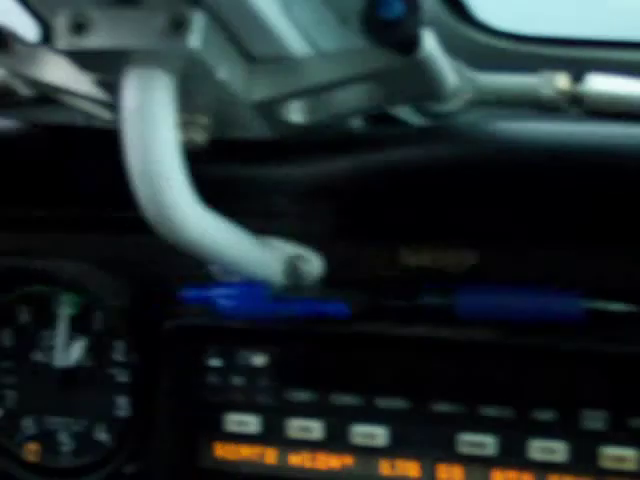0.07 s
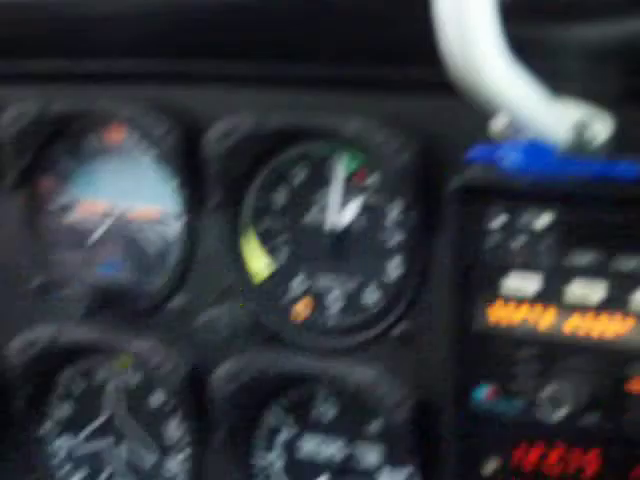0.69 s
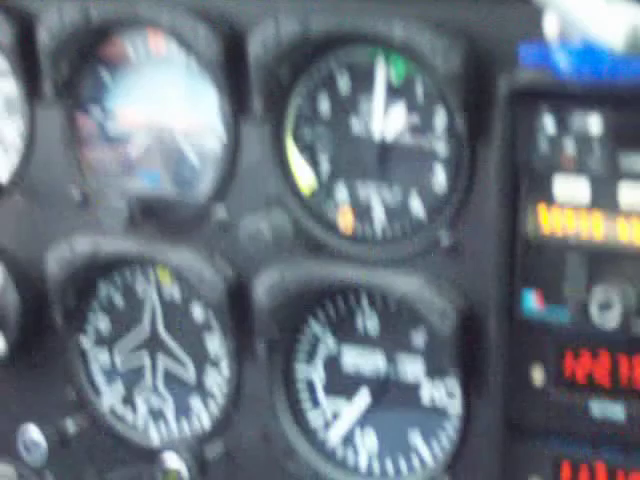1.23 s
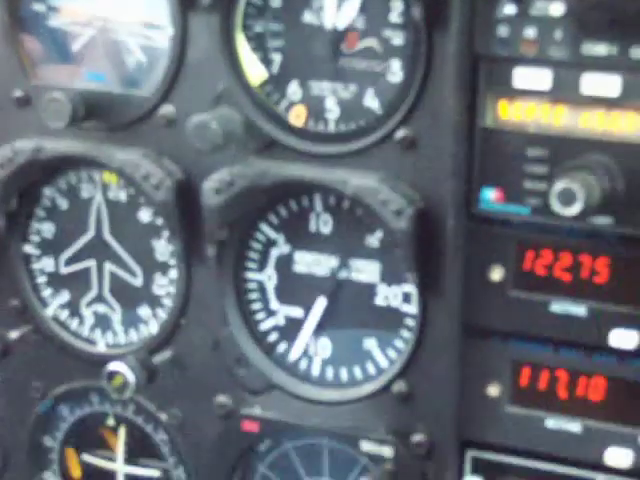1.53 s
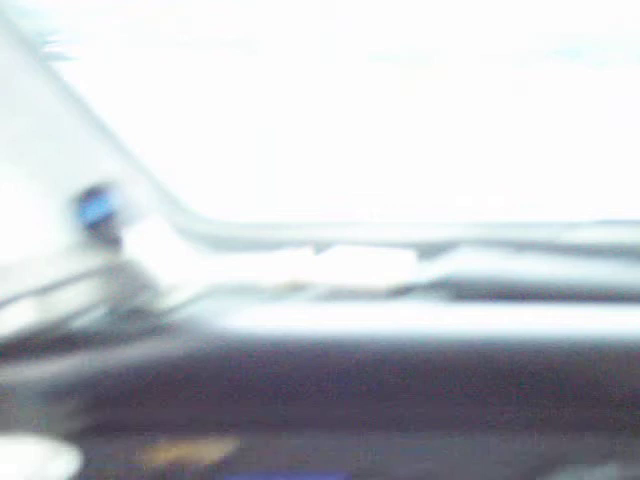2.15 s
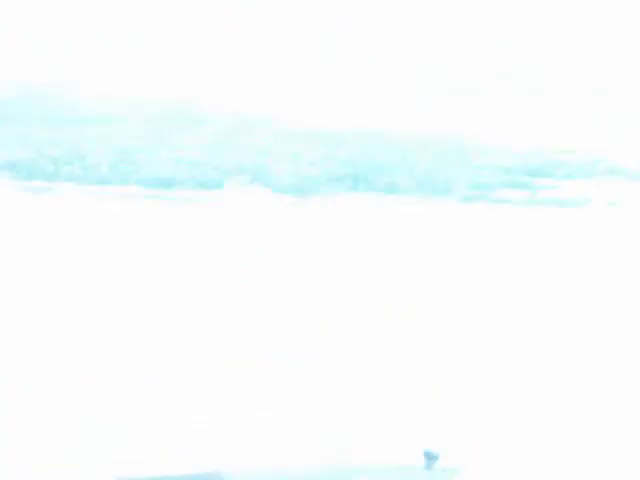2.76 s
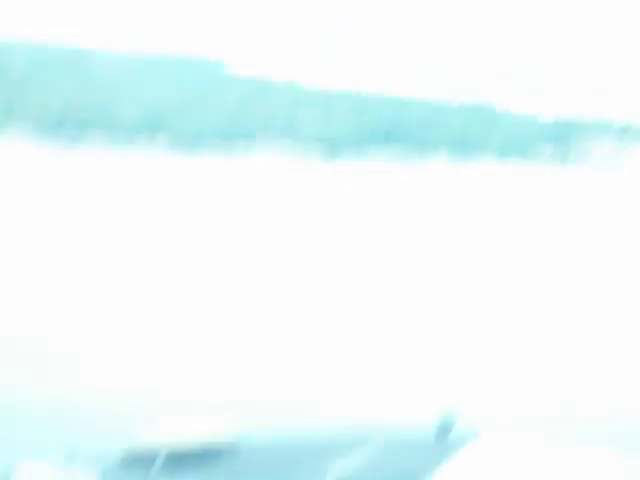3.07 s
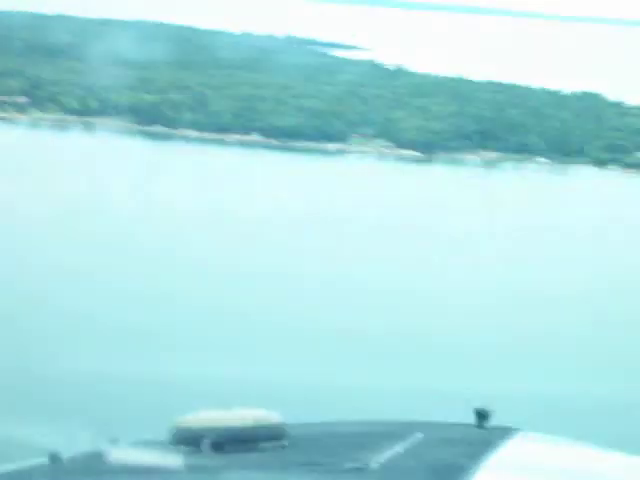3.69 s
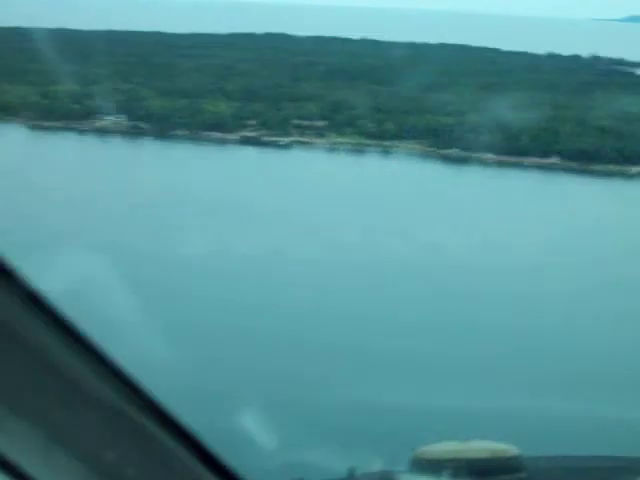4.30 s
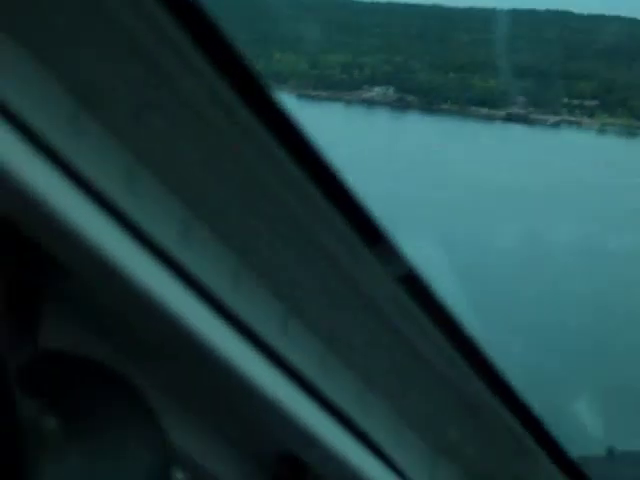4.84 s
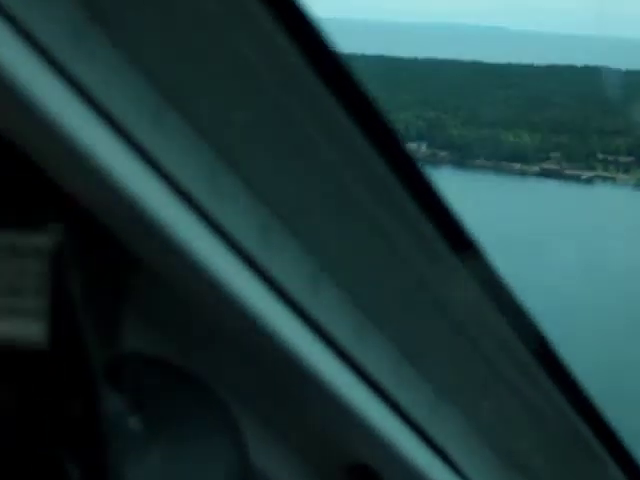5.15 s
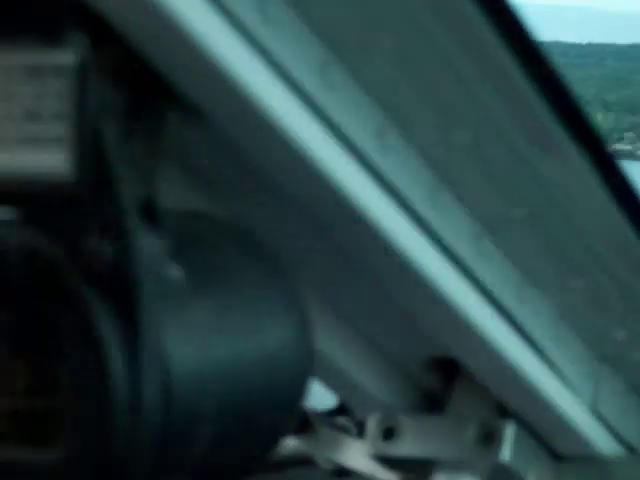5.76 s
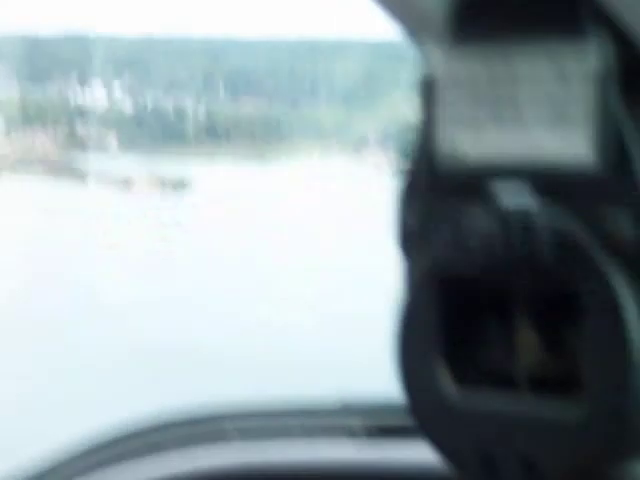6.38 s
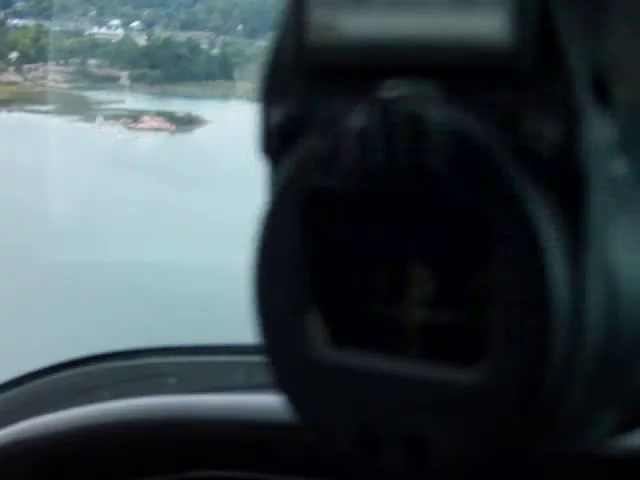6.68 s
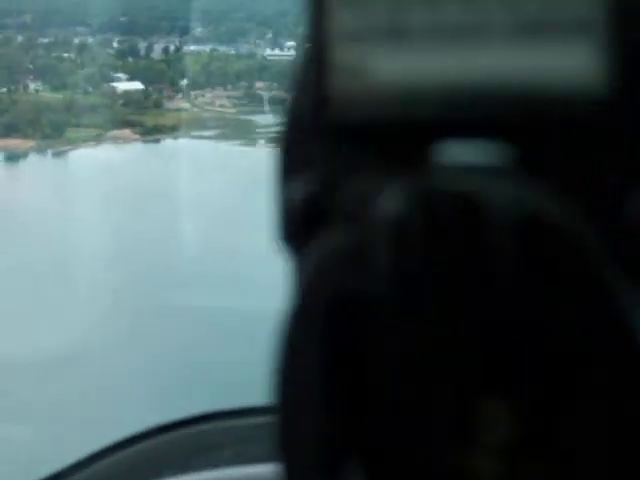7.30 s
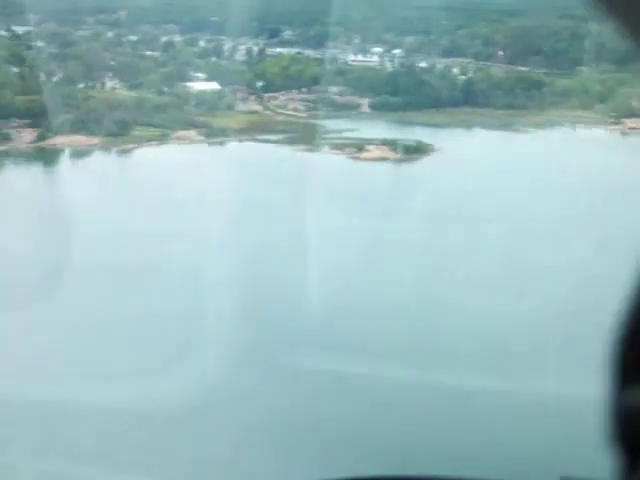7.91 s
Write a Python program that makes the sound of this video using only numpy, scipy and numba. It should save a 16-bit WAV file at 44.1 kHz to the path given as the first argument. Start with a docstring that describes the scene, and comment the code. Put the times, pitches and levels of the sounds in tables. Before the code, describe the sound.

Inside the cabin of a small plane in level flight, a loud piston engine and propeller drone steadily over low rumble and hissing air. A thin electric pump whine sinks slowly in pitch and stops with a faint click about halfway through. Near the end comes one sharp, hard click. The tone of the drone shifts a little as the hand-held microphone turns.

```python
"""Seaplane cabin in level flight.

Four-cylinder exhaust and propeller drone through the cabin's standing waves as a hand-held microphone
turns. Propeller wash beats on the hull; slipstream, seals and an air vent hiss. An electric pump whines,
slowing under load until it clicks off. Later a hard click ducks the limiter. The treble is cut, except
for one thin tick."""
import sys
import numpy as np
from scipy import signal
from scipy.fft import rfft, irfft, next_fast_len
from scipy.io import wavfile
from scipy.ndimage import map_coordinates
from numba import njit

SR = 44100
rng = np.random.default_rng(int(sys.argv[2]) if len(sys.argv) > 2 else 0)


def transcribe(u):
    """Save the signal u as a 16-bit wav file named by the first command-line argument.

    u: samples, shape (n,) or (channels, n), limited to [-1, 1]; the rate is SR.
    q: integer samples, one column per channel.
    """
    v = np.clip(np.atleast_2d(u).T, -1, 1)
    q = np.round(v * 32767).astype(np.int16)
    wavfile.write(sys.argv[1], SR, q)


N = 358533

# (time [s], firing and blade rate [Hz])
BEAT_RATE = [(0, 76.77), (1.2, 75.4), (2.0, 74.9), (3.6, 73.7), (4.3, 74.18), (5.2, 75.8), (5.6, 76.04),
             (6.0, 76.17), (7.6, 74.56), (8.13, 74.16)]

def crank_turns():
    """Running count of crank turns: two beats a turn, with slight jitter."""
    beat_hz, = curves(BEAT_RATE)
    return np.cumsum(beat_hz / 2 * (1 + .0012 * walk(12))) / SR


# Beat and octave, even across the cabin: (crank order, peak level [dB])
BOOM_ORDERS = [(2, -21.5), (4, -19.7)]
# (nominal crank order, peak level off the spot [dB], lift at the spot [dB], spot [deg])
STANDING_ORDERS = [(5, -35, 7, 66), (6, -35, 5, 66), (7.9, -41.5, 13.5, 57), (10, -37, 5, 33),
                   (12, -28.5, -3.5, 110), (14, -40, 12, 116), (16, -43, 10.5, 55), (18, -37, 8, 63.3),
                   (20, -37, 4.5, 58), (26, -47.5, 9, 42), (31.83, -51, 11, 71)]
# (crank order, base level [dB])
WEAK_ORDERS = [(3.5, -39.5), (4.5, -44.5), (7.5, -42.5), (8.5, -38.5), (13, -45), (22, -44.5), (24, -48),
               (28, -48.5), (30, -46.5), (34, -48), (36, -49), (38, -47), (42, -57.5), (44, -47)]

def engine_drone(turns, aim_deg, scatter_rad=.188, crank_spot_width_deg=300):
    """Firings and blades are pressure dips; the swaying microphone crosses their standing waves."""
    def partial(order, smear_rad):
        order = round(2 * order) / 2  # firing pattern repeats every two turns
        cabin_phase = smear_rad * order * rng.standard_normal()
        return -np.cos(2 * np.pi * order * turns + cabin_phase)
    out = 0
    for order, db in BOOM_ORDERS:
        out += undb(db + .76 * walk(1.5)) * (1 + .08 * walk(7.3)) * partial(order, scatter_rad / 2)
    for order, db, lift_db, spot_deg in STANDING_ORDERS:
        width_deg = crank_spot_width_deg / order  # narrows with wavelength
        level_db = db + lift_db * near_spot(aim_deg, spot_deg, width_deg) + 1.84 * walk(2.49)
        out += undb(level_db) * (1 + .08 * walk(9)) * partial(order, scatter_rad / 2)
    for order, db in WEAK_ORDERS:
        level_db = db + .5 + 2.5 * walk(1.614)
        out += undb(level_db) * (1 + .21 * walk(22)) * partial(order, scatter_rad)
    return out


# Both: (frequency [Hz], relative density [dB])
LOW_WASH_SPECTRUM = [(150, -20.5), (245, -3.5), (270, 0.5), (320, 0.5), (370, -1), (415, -0.5), (460, 1),
                     (505, -2), (560, -3.5), (640, -17.5)]
HIGH_WASH_SPECTRUM = [(480, -14.5), (600, -0.5), (660, 2.5), (710, -0.5), (760, -0.5), (805, 0),
                      (900, -7.5), (1300, -15), (2200, -29.5)]

def propeller_wash(turns, aim_deg):
    """Air thrown on the hull, pulsing with the blades."""
    gusts = blade_gusts(turns, depth_db=6.5, uneven_db=1.85)
    low = air_gain("low wash", aim_deg) * colour(noise() * gusts, LOW_WASH_SPECTRUM)
    high = air_gain("high wash", aim_deg) * colour(noise() * gusts, HIGH_WASH_SPECTRUM)
    return undb(.47 * walk(3)) * (low + high)


# (frequency [Hz], relative density [dB])
RUMBLE_SPECTRUM = [(14, -20), (28, -17), (48, -11.5), (70, -8.5), (105, 0), (130, -8), (195, -8.5),
                   (240, -20.5), (400, -32)]

def hull_rumble(rms_db=-24.5):
    """Low, nearly steady noise of the hull."""
    return undb(rms_db + .5 * walk(3)) * colour(noise(), RUMBLE_SPECTRUM)


# (time [s], 3rd slot harmonic peak [dB], 4th slot harmonic peak [dB])
WHINE_LEVELS = [(0, -23.5, -59), (0.599, -28, -56), (1.0, -37, -51.5), (1.9, -34.5, -41), (2.2, -32, -49.5),
                (3.2, -34, -43), (3.75, -27.5, -40), (4.05, -31.5, -38.5), (4.5, -37, -49)]
# (shaft order, initial peak level [dB])
ROTOR_TONES = [(7, -42), (9, -50), (16, -44), (22, -52), (23, -41), (25, -38), (26, -49), (30, -53),
               (31, -48), (33, -54)]

def pump(start_hz=175.4, sag_hz_per_s=3.15, slots=8, off_s=4.52):
    """Motor slots sing, slowing as the load grows; the lopsided rotor adds side tones."""
    t = np.arange(N) / SR
    shaft_hz = (start_hz - sag_hz_per_s * t) * (1 + .0004 * walk(25))
    angle = 2 * np.pi * np.cumsum(shaft_hz) / SR
    out = undb(-36.5 - 2.5 * t + 2.5 * walk(5.5)) * np.sin(slots * angle)
    for harmonic, db in zip((3, 4), curves(WHINE_LEVELS)):
        out += undb(db + .2 * walk(12)) * np.sin(harmonic * slots * angle)
    for order, db in ROTOR_TONES:
        standing_wave_db = 2 * walk(4)
        out += undb(db - 2.17 * t + standing_wave_db) * np.sin(order * angle)
    running = np.clip((off_s - t) / .02 + 1, 0, 1)
    return out * running


# Switches and hard plastic: (time [s], strength [dB], t60 scale, relative rattle [dB])
CONTACTS = [(4.521, -16.5, 2.5, -14), (4.526, -20, 2, -14), (7.1887, -1.5, 0.91, -15.5)]
# (frequency [Hz], relative level [dB], base t60 [s])
CONTACT_MODES = [(2600, -7, 0.016), (2895, -9.5, 0.021), (3310, -2, 0.02), (3550, -9.5, 0.021),
                 (4470, -8, .032), (5050, -8, 0.037), (5630, -13, 0.031), (6250, -37, .02)]

def clicks(rattle_t60_s=.053, rattle_hz=3600, rattle_width_hz=2200):
    """Sharp contacts ring small hard parts, which chatter briefly and radiate no bass."""
    out, t = np.zeros(N), np.arange(SR // 10) / SR
    for time_s, db, t60_scale, rattle_db in CONTACTS:
        modes = 0
        for hz, mode_db, t60_s in CONTACT_MODES:
            tilt_db = .46 * db * np.log2(hz / rattle_hz)  # gentler contact: longer, duller
            decay_db = 60 * t / (t60_s * t60_scale)
            modes += undb(mode_db + tilt_db - decay_db) * np.sin(2 * np.pi * hz * t)
        chatter = resonate_twice(rng.standard_normal(len(t)), rattle_hz, rattle_width_hz)
        chatter *= undb(rattle_db - 60 * t / rattle_t60_s)
        start = int(time_s * SR)
        out[start:start + len(t)] += undb(db) * (modes / 2 + chatter)
    return signal.sosfilt(signal.butter(4, (2300, 6200), "bandpass", fs=SR, output="sos"), out)


# (frequency [Hz], relative density [dB])
SLIPSTREAM_SPECTRUM = [(600, -16.5), (1100, -1.5), (1550, -2), (2100, 2), (2500, -0.5), (3200, -2.5),
                       (4500, -12.5), (6500, -48.5)]

def slipstream(turns, aim_deg):
    """Air rushing past the cabin, roughened by uneven blade gusts."""
    gusts = blade_gusts(turns, depth_db=0, uneven_db=2.5)
    return air_gain("slipstream", aim_deg) * colour(noise() * gusts, SLIPSTREAM_SPECTRUM)


# (frequency [Hz], relative density [dB])
SEAL_SPECTRUM = [(1500, -13), (2900, -11.5), (3200, 0), (3650, 1), (4000, 2.5), (4400, 2.5), (5000, -1.5),
                 (5600, -7.5), (6100, -16.5), (6700, -34)]

def seal_hiss(aim_deg):
    """Air hissing at the seals, flickering slightly."""
    return air_gain("seals", aim_deg) * undb(walk(10)) * colour(noise(), SEAL_SPECTRUM)


# Vent first: (centre [Hz], nominal width [Hz])
HISS_BANDS = [(2715, 230), (3330, 180), (4460, 240)]
# (time [s], vent [dB], middle band [dB], upper band [dB])
HISS_LEVELS = [(0, -32, -44, -53), (1.6, -32, -41.5, -47.5), (2.03, -30, -42, -48),
               (2.45, -37.5, -51.5, -54), (4.5, -39.5, -51.5, -53.5), (6.4, -35.5, -46, -52.5),
               (6.85, -31.5, -36, -46), (7.2, -35, -44, -44), (8.13, -32.5, -42, -41)]

def resonant_hiss():
    """Air rings in the vent and two higher resonances; levels shift as the microphone turns."""
    return sum(undb(db + .89 * walk(12)) * resonate_twice(noise(), hz, 1.5 * width_hz)
               for (hz, width_hz), db in zip(HISS_BANDS, curves(HISS_LEVELS)))


# {noise name: base level [dB]}
AIR_LEVELS = {"low wash": -28, "high wash": -32, "slipstream": -34, "seals": -34}
# (noise name, lift [dB], spot [deg], width [deg])
CABIN_SPOTS = [("low wash", -1.1, 0, 8), ("low wash", 1.5, 78, 14), ("high wash", -1.8, 0, 5.3),
               ("high wash", 1.7, 46, 28), ("high wash", 2, 120, 7), ("slipstream", 2.8, 67, 30),
               ("slipstream", -3.5, 42, 10), ("seals", -1.95, 57, 55)]

def air_gain(name, aim_deg):
    """Gain of one air noise, shaded or reflected by the cabin at spots along the turn."""
    level_db = AIR_LEVELS[name]
    for source, lift_db, spot_deg, width_deg in CABIN_SPOTS:
        if source == name:
            level_db += lift_db * near_spot(aim_deg, spot_deg, width_deg)
    return undb(level_db)


def blade_gusts(turns, depth_db, uneven_db):
    """One gain pulse a beat, each of its own strength; the four cylinders differ slightly."""
    beat = (2 * turns + .5).astype(int)
    cylinder_db = np.array([-.5, .5, 0, 0])[beat % 4]
    strength_db = depth_db + uneven_db * rng.standard_normal(1024)[beat] + cylinder_db
    return undb(strength_db * np.cos(2 * np.pi * turns) ** 4)


def near_spot(aim_deg, spot_deg, width_deg):
    """1 at the spot, falling to 0 away from it."""
    return np.exp(-((aim_deg - spot_deg) / width_deg) ** 2)


def undb(db):
    """Decibels to gain."""
    return 10 ** (np.asarray(db) / 20)


def curves(table):
    """Per-sample curves from (time [s], values...) rows."""
    time_s, *columns = np.transpose(table)
    return [np.interp(np.arange(N) / SR, time_s, column) for column in columns]


def unit(x):
    """Scale to rms 1."""
    return x / np.sqrt(np.mean(x ** 2))


def noise():
    """White noise."""
    return rng.standard_normal(N)


def walk(rate_hz):
    """Smooth random wander, rms 1."""
    grid = np.arange(0, N, 64)
    coarse = map_coordinates(rng.standard_normal(2048), [grid * rate_hz / SR], mode="wrap")
    return unit(np.interp(np.arange(N), grid, coarse))


def colour(x, spectrum):
    """Filter by (frequency [Hz], level [dB]) points, rolling off past both ends; rms 1."""
    size = next_fast_len(N)
    log_hz = np.log(np.maximum(np.arange(size // 2 + 1) * SR / size, 1))
    hz, db = np.transpose(spectrum)
    beyond = np.abs(log_hz - np.clip(log_hz, np.log(hz[0]), np.log(hz[-1])))
    gain = undb(np.interp(log_hz, np.log(hz), db) - 60 * beyond)
    return unit(irfft(rfft(x, size) * gain, size)[:N])


def resonate_twice(x, hz, width_hz):
    """Two equal resonators in series; rms 1."""
    b, a = signal.iirpeak(hz, hz / width_hz, SR)
    return unit(signal.lfilter(b, a, signal.lfilter(b, a, x)))


def low_pass(x, hz):
    """Steep treble cut."""
    return signal.sosfilt(signal.ellip(10, .2, 80, hz, fs=SR, output="sos"), x)


@njit
def peak_follower(x, release):
    """Instant attack, exponential release."""
    out, peak = np.empty(len(x)), 0.
    for i in range(len(x)):
        peak = max(abs(x[i]), peak * release)
        out[i] = peak
    return out


# Panel, windscreen, pillar, side window: (time [s], aim [deg])
MICROPHONE_AIM = [(0, -2), (2.0, -1), (2.5, 36), (4.2, 49.5), (6.35, 82), (6.9, 107.5), (8.13, 125.5)]

def scene():
    """The cabin at one turning microphone."""
    turns = crank_turns()
    aim_deg, = curves(MICROPHONE_AIM)
    drone = engine_drone(turns, aim_deg)
    hull = propeller_wash(turns, aim_deg) + hull_rumble()
    hiss = slipstream(turns, aim_deg) + seal_hiss(aim_deg) + resonant_hiss()
    return (drone + hull + hiss + pump() + clicks())[None]


def record(dry, ceiling=.5, release_s=.21, top_hz=6650, tick_s=2.237, tick_top_hz=16000):
    """Peak limiter and treble cut; one thin tick reaches above the cut."""
    peak = peak_follower(dry[0], np.exp(-1 / (release_s * SR)))
    limited = dry * np.minimum(1, ceiling / (peak + 1e-9))
    tick = undb(-15.5) * signal.unit_impulse(N, int(tick_s * SR))
    return low_pass(low_pass(limited, top_hz) + tick, tick_top_hz)


dry = scene()
out = record(dry)
transcribe(out)
```